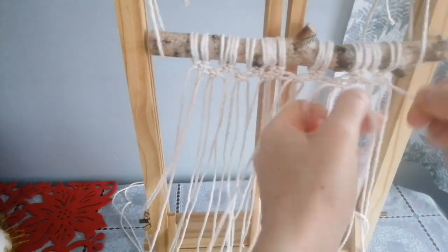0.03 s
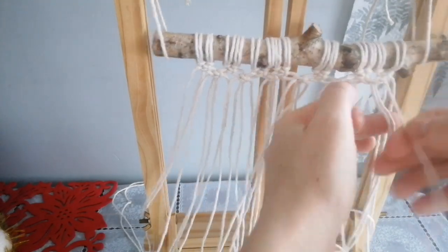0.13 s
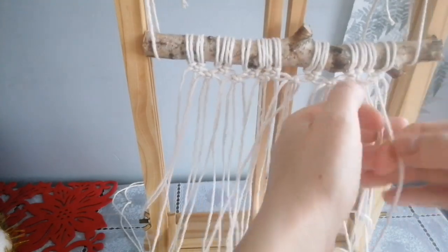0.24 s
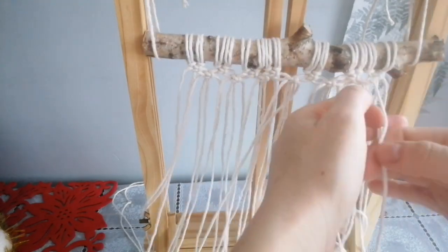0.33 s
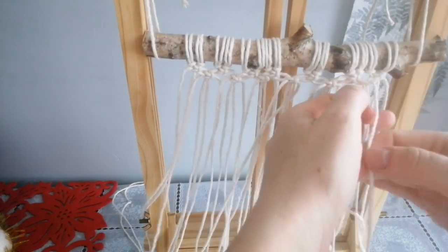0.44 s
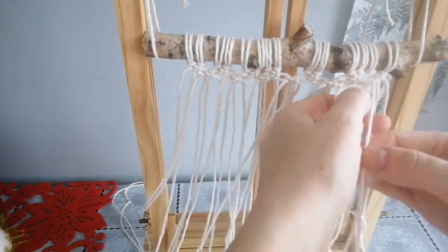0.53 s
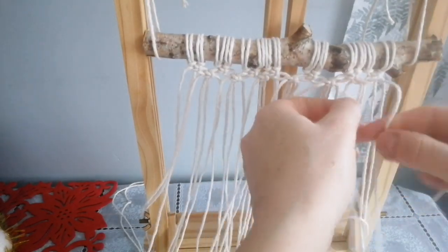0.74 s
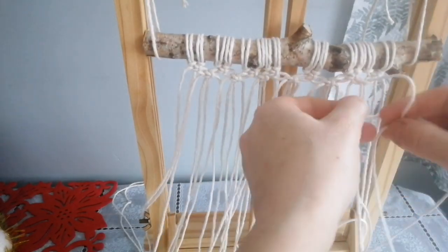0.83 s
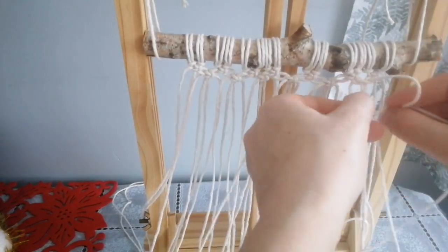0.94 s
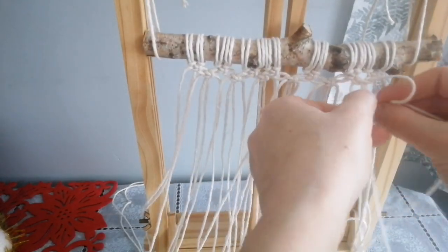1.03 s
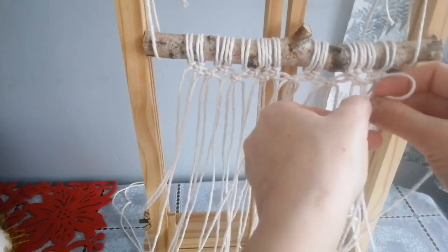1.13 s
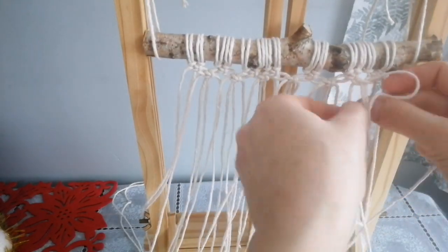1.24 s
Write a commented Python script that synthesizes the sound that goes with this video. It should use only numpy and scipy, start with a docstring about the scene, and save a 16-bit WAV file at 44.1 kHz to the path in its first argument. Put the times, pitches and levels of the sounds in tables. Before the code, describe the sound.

Cotton cord rustles and slips through fingers in short, uneven pulls, close by in a small, quiet room. At about 0.25 seconds the wooden frame takes a knock and wobbles with a low rumble. Cords flick lightly against wood from 0.5 to 0.7 seconds, and a strand pulls taut with a low thrum near 0.65. Softer rustles follow, with small ticks around 1.1 seconds.

```python
"""Cotton cord slides through fingers as hands knot it on a branch hung in a wooden frame.
Its fibres catch and slip with a rustle, tight knots squeak, and cords flick against the wood.
The frame takes a knock and wobbles, and one strand is pulled taut so that the frame thrums low.
It all happens close by in a small, quiet room, heard through a mild noise suppressor."""
import sys
import numpy as np
from scipy import signal
from scipy.fft import rfft, irfft, next_fast_len
from scipy.io import wavfile
from scipy.ndimage import uniform_filter1d

SR = 44100
rng = np.random.default_rng(int(sys.argv[2]) if len(sys.argv) > 2 else 0)


def log_audio(samples):
    """Write samples as a 16-bit WAV file to the path given in sys.argv[1]."""
    # one column per channel
    frames = np.atleast_2d(samples).T
    # limit to full scale, then quantise
    limited = np.clip(frames, -1, 1)
    pcm = np.round(limited * 32767).astype(np.int16)
    wavfile.write(sys.argv[1], SR, pcm)


N = 57330
T = np.arange(N) / SR

# Levels are relative. A sound drops 20 dB in fade_s (negative: it stops at once) and 60 dB in ring_s.
# Cord slides: start_s, rise_s, hold_s, fade_s, level_db, brightness_db_per_octave, left_minus_right_db
SLIDES = [(-.01, 0.0033, 0.0066, 0.08, -43, -2.5, 1), (0.029, .012, 0.031, 0.09, -58, -2, -3.5),
          (0.074, 0.003, 0.007, 0.1, -61, 5.5, -1), (0.122, 0.042, 0.11, 1.5, -69, 1, 15),
          (0.45, 0.0034, 0.0144, -1.37, -57.5, -0.1, -5.5), (0.609, 0.0022, 0.021, 0.1457, -51, 0.3, -6),
          (0.647, 0.014, 0.01, 0.0528, -38, -1.2, 4), (0.668, 0.0076, .022, -0.15, -49.5, -4.9, 10.5),
          (0.75, 0.013, 0.014, -0.22, -54, -3.5, -6), (0.848, 0.0067, 0.0056, -0.72, -61, 0, 5.5),
          (1.022, 0.028, 0.046, .03, -62, -0.5, 1), (1.085, 0.0026, 0.024, -0.18, -58.5, 3, -0.5),
          (1.119, 0.0022, 0.0088, 0.0446, -51, 0.8, -1.5), (1.132, 0.041, 0.017, -0.18, -53, 0.86, -5),
          (1.29, 0.0022, 0.031, 6, -56, -2, 9)]
# Tone of the rubbing fibres: frequency_hz, level_db
FIBRE_TONE = [(100, -8.5), (380, 4), (580, -9), (800, -5), (1040, 2.5), (1350, -4), (1800, 2), (2900, -2.5),
              (3700, -8.5), (6500, -12), (8700, -19), (11200, -19.5), (15500, -36.5)]
# Squeaks in a tight knot: start_s, rise_s, hold_s, fade_s, level_db, pitch_hz
SQUEAKS = [(0.007, 0.039, 0.27, 0.1, -70, 2723), (0.745, 0.011, 0.016, 0.05, -59, 1872)]
# Cord flicking on wood: start_s, level_db, ring_minus_snap_db
FLICKS = [(0.529, -45, 6.5), (.5515, -56.5, -21), (0.603, -57.5, -33.5), (0.6146, -51.5, 0.5),
          (0.631, -54, 4), (0.647, -54, -20.5), (0.6716, -43.5, -4), (0.6947, -52, -2), (0.7088, -52.5, 2),
          (1.086, -60.5, -4), (1.1259, -55, 1)]
# Tone of the cord's snap: frequency_hz, level_db
SNAP_TONE = [(100, -21), (600, -12), (1100, -2), (2800, 6.5), (3700, 2), (6000, -1.5), (8500, -11.5),
             (11200, -9), (15500, -22.5)]
# Ringing of the branch: pitch_hz, level_db, ring_s
BRANCH_NOTES = [(990, -12, 0.042), (1032, -13.5, .035), (1520, -9, 0.077), (1767, -1.5, 0.032),
                (1950, 0, 0.028), (2333, -1.5, .014), (2958, 2.5, 0.014), (4290, -6, 0.015),
                (10850, -8, 0.0074)]
# Thrum of the taut cord and frame: pitch_hz, level_db, ring_s
THRUM_NOTES = [(109, -3, 0.21), (132.95, 0, 0.38), (203.4, -13, 0.23), (300.5, -21.5, 0.49),
               (346, -11.5, .1), (483, -22, .16)]
# Tone of the knock's crack: frequency_hz, level_db
CRACK_TONE = [(300, -16), (600, -0.5), (1200, 2), (2400, 2), (3700, -6.5), (5200, -7), (7000, -6),
              (9500, -24.5), (15000, -36)]
# Ringing of the frame: pitch_hz, level_db, ring_s
FRAME_NOTES = [(486, -21.5, 0.029), (808, -11, 0.26), (875, -2, 0.056), (1195, 5.5, 0.061),
               (1620, 5.5, 0.046), (1616, -11, 0.15), (2167, 0.5, 0.092), (2578, -1.5, 0.048),
               (2640, -17, 0.049)]
# Low bending of the frame: pitch_hz, level_db, ring_s
THUD_NOTES = [(106.5, 1, 0.23), (198, -4.5, 0.15), (301, 14.5, 0.041), (340, -10, 0.077), (390, -16, 0.16)]
# Filter that dulls the thud: frequency_hz, gain_db
THUD_TONE = [(20, -1.5), (400, -0.5), (480, -13.5), (700, -12), (3000, -40)]
# Hands shaking the frame: start_s, rise_s, hold_s, fade_s, level_db, brightness_db_per_octave
WOBBLES = [(0.159, 0.028, 0.064, 0.52, -46.5, 1), (0.285, .012, .03, 0.09, -39, 5),
           (0.306, 0.038, 0.0085, 0.2044, -37.5, -6.5), (0.455, 0.0085, 0.007, -0.05, -46.5, -3),
           (0.684, 0.017, 0.05, 0.15, -49, 1), (-.01, 0.0088, 0.059, 0.09, -50.5, 7.5),
           (1.282, 0.014, 0.018, 3, -59, 8.5)]
# Tone of the shaking frame: frequency_hz, level_db
WOBBLE_TONE = [(20, -15.5), (50, 4.5), (125, 5), (220, -13.5), (310, -11), (410, -13.5), (500, -43.5),
               (1000, -57), (4000, -97)]
# Gentle touches on the hollow frame: start_s, level_db
TOUCHES = [(.457, -52), (0.6137, -50), (.662, -42.5), (0.866, -59.5), (1.126, -67)]
# Tone of a touch: frequency_hz, level_db
TOUCH_TONE = [(200, -18.5), (700, -19), (900, 0.5), (1060, 2.5), (1300, -6), (1700, -1), (2200, -16),
              (3000, -14.5), (4000, -24), (12000, -38)]
# Tone of the room's still air: frequency_hz, level_db
AIR_TONE = [(20, -7.5), (48, 4), (70, -13), (100, -0.5), (200, -14), (300, -14), (600, -30), (1100, -30.5),
            (1500, -27), (2700, -28), (4000, -34), (10000, -40.5), (15500, -44)]
# How long the room echoes: frequency_hz, ring_s
ECHO_TIMES = [(100, 0.22), (350, 0.33), (700, .32), (1500, 0.26), (4000, 0.35), (12000, 0.22)]
# Tone of the echo: frequency_hz, gain_db
ECHO_TONE = [(60, -45), (150, -23), (450, -2), (1200, 4), (4000, 2), (12000, 2.5)]
# Which way the cord's sound leans: frequency_hz, left_minus_right_db
CORD_SIDE = [(100, 3.5), (2000, 0.5), (4500, -1), (7500, 1), (11000, -10), (15000, -6)]
# Which way the frame's sound leans: frequency_hz, left_minus_right_db
FRAME_SIDE = [(150, 1), (300, 3.3), (800, 0), (2000, 3.5), (7000, 4), (11000, -3.5)]


def cord_slides(snags_per_s=2600, snag_spread_db=4, hiss_share=0.54, uneven_db=2, uneven_s=0.005):
    """Fibres catch and slip in many tiny snags over a soft hiss; the pull is uneven."""
    out = np.zeros((2, N))
    for start, rise, hold, fade, db, brightness, side_db in SLIDES:
        snags = (rng.random(N) < snags_per_s / SR) * rng.choice([-1, 1], N)
        snags = snags * gain(snag_spread_db * np.minimum(rng.exponential(1, N), 4))
        drift = uniform_filter1d(rng.standard_normal(N), round(uneven_s * SR))
        grip = gain(uneven_db * normalize(drift))
        hiss = hiss_share * rng.standard_normal(N)
        rub = shape_tone((normalize(snags) + hiss) * grip, FIBRE_TONE, brightness)
        out += pan(gain(db) * normalize(rub) * swell(start, rise, hold, fade), side_db)
    return out


def knot_squeaks(width_octaves=0.064):
    """Tight cord slips at a nearly even rate: a faint rasp around one pitch."""
    hz = np.fft.rfftfreq(N, 1 / SR) + 1
    out = np.zeros(N)
    for start, rise, hold, fade, db, pitch in SQUEAKS:
        band = 1 / (1 + (np.log2(hz / pitch) / width_octaves) ** 2)
        rasp = irfft(rfft(rng.standard_normal(N)) * band, N)
        out += gain(db) * normalize(rasp) * swell(start, rise, hold, fade)
    return out


def cord_flicks():
    """A cord slips free with a dry snap and ticks against the branch."""
    out = np.zeros(N)
    for start, db, wood_db in FLICKS:
        snap = burst(start, SNAP_TONE, rise_s=0.00048, ring_s=0.015)
        wood = gain(wood_db) * ring(start, BRANCH_NOTES, rise_s=0.00086)
        out += gain(db) * (snap + wood)
    return out


def cord_tug():
    """A strand comes taut and thrums together with the frame."""
    return gain(-23) * ring(start_s=0.6615, notes=THRUM_NOTES, rise_s=0.0095)


def frame_knock(start_s=0.2555, thud_delay_s=0.0025):
    """The branch bumps the frame: a crack, ringing wood and a low thud."""
    crack = burst(start_s, CRACK_TONE, rise_s=0.0019, ring_s=0.028)
    wood = ring(start_s, FRAME_NOTES, rise_s=0.00068)
    thud = ring(start_s + thud_delay_s, THUD_NOTES, rise_s=0.00086)
    return gain(-39.5) * (crack + wood) + gain(-24.5) * shape_tone(thud, THUD_TONE)


def frame_wobbles():
    """The frame shudders under the hands with a low rumble."""
    out = np.zeros(N)
    for start, rise, hold, fade, db, brightness in WOBBLES:
        rumble = shape_tone(rng.standard_normal(N), WOBBLE_TONE, brightness)
        out += gain(db) * normalize(rumble) * swell(start, rise, hold, fade)
    return out


def soft_touches():
    """Fingers and knots meet the wood softly: dull, hollow taps."""
    return sum(gain(db) * burst(start, TOUCH_TONE, rise_s=0.0021, ring_s=0.013) for start, db in TOUCHES)


def room_echo(sound, early_db=9.5, early_s=0.0061, gap_s=0.0012):
    """Sound bounces around the room: strong early echoes, then a short tail."""
    early_boost = 1 + gain(early_db) * np.exp(-T / early_s)
    bounces = rng.standard_normal((2, N)) * (T > gap_s) * early_boost
    hz, t, bands = signal.stft(bounces, SR, nperseg=256)
    decay = gain(-60 * t / value_at(ECHO_TIMES, hz)[:, None])
    echo = signal.istft(bands * decay, SR, nperseg=256)[1][:, :N]
    echo = shape_tone(echo / np.linalg.norm(echo, axis=1, keepdims=True), ECHO_TONE)
    return signal.fftconvolve(sound[None], echo, axes=1)[:, :N]


def room_air(level_db=-57, split_hz=550):
    """The room's faint hush: the lows are alike in both ears, the highs are not."""
    hz = np.fft.rfftfreq(N, 1 / SR)
    shared, separate = rfft(rng.standard_normal(N)), rfft(rng.standard_normal((2, N)))
    likeness = 1 / (1 + (hz / split_hz) ** 2)
    noise = np.sqrt(likeness) * shared + np.sqrt(1 - likeness) * separate
    return gain(level_db) * normalize(irfft(noise * gain(value_at(AIR_TONE, hz)), N))


def gain(db):
    """Turns decibels into a number to multiply by."""
    return 10 ** (np.asarray(db) / 20)


def normalize(x):
    """Scales a sound to an average power of 1."""
    return x / np.sqrt(np.mean(x ** 2) + 1e-20)


def normalize_hit(x):
    """Gives a hit the energy of 10 ms at a power of 1."""
    return x / np.sqrt(np.sum(x ** 2) / (SR / 100) + 1e-20)


def value_at(table, hz):
    """Looks up a frequency in a table, blending between rows."""
    row_hz, values = np.transpose(table)
    return np.interp(np.log(hz + 1), np.log(row_hz + 1), values)


def shape_tone(x, tone, brightness=0, share=1):
    """Filters a sound by a tone table; brightness tilts it around 2 kHz, in dB per octave."""
    size = next_fast_len(N + SR // 4)
    hz = abs(np.fft.fftfreq(size, 1 / SR))
    curve_db = share * value_at(tone, hz) + brightness * np.log2((hz + 20) / 2000)
    # The Hilbert step keeps the filter from ringing before a sound starts.
    response = np.exp(np.conj(signal.hilbert(np.log(gain(curve_db)))))[:size // 2 + 1]
    return irfft(rfft(x, size) * response, size)[..., :N]


def swell(start_s, rise_s, hold_s, fade_s):
    """A loudness curve that rises, holds and fades."""
    rising = np.clip((T - start_s) / max(rise_s, 1e-4), 0, 1)
    fading_for_s = np.maximum(T - start_s - rise_s - hold_s, 0)
    return rising * gain(-20 * fading_for_s / max(fade_s, 1e-3))


def ring(start_s, notes, rise_s):
    """An object rings with several notes, each dying away at its own speed."""
    t = np.maximum(T - start_s, 0)
    ringing = sum(gain(db - 60 * t / ring_s) * np.sin(2 * np.pi * hz * t) for hz, db, ring_s in notes)
    return normalize_hit(np.minimum(t / rise_s, 1) * ringing)


def burst(start_s, tone, rise_s, ring_s):
    """The short puff of noise when two things meet."""
    noise = rng.standard_normal(N) * swell(start_s, rise_s, 0, ring_s / 3)
    return normalize_hit(shape_tone(noise, tone))


def pan(x, side_db):
    """Makes a left and right pair; positive side_db leans left."""
    return x * gain(np.array([[side_db], [-side_db]]) / 2)


def place(pair, side, echo_db, left_delay_s=0):
    """Adds the room's echo to a pair and leans each frequency left or right."""
    late_left = np.pad(pair[0], (round(left_delay_s * SR), 0))[:N]
    left, right = np.array([late_left, pair[1]]) + gain(echo_db) * room_echo(pair.mean(0))
    return np.array([shape_tone(left, side, share=0.5), shape_tone(right, side, share=-0.5)])


def suppress_noise(x, cut_db=3, range_db=14):
    """Turns each frequency band down while it is near its quietest, which shortens the tails."""
    bands = signal.stft(x, nperseg=512, noverlap=384)[2]
    power = (abs(bands) ** 2).mean(0)
    smooth_power = uniform_filter1d(uniform_filter1d(power, size=7, axis=0), size=7, axis=1)
    level_db = 10 * np.log10(abs(smooth_power) + 1e-20)
    above_floor_db = level_db - np.percentile(level_db, 15, axis=1, keepdims=True)
    quietness = np.clip(1 - above_floor_db / range_db, 0, 1)
    return signal.istft(bands * gain(-cut_db * quietness), nperseg=512, noverlap=384)[1][:, :N]


def scene(left_delay_s=0.00034):
    """Cord a little to the right, the frame to the left, in one room."""
    handling = cord_slides() + knot_squeaks() + soft_touches()
    cord = place(handling, CORD_SIDE, echo_db=-1, left_delay_s=left_delay_s)
    flicks = place(pan(cord_flicks(), side_db=-5), CORD_SIDE, echo_db=-4, left_delay_s=left_delay_s)
    wood = frame_knock() + cord_tug() + frame_wobbles()
    frame = place(pan(wood, side_db=0), FRAME_SIDE, echo_db=-1.5)
    return gain(-2) * (cord + flicks + frame) + room_air()


def record(dry):
    """Mild noise suppression, then a filter removes the highest treble."""
    low_pass = signal.firwin(255, cutoff=15500, window=("kaiser", 8), fs=SR)
    return signal.oaconvolve(suppress_noise(dry), low_pass[None], "same")


dry = scene()
out = record(dry)
log_audio(out)
```